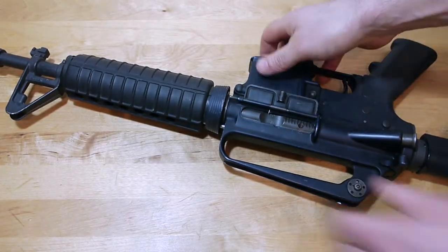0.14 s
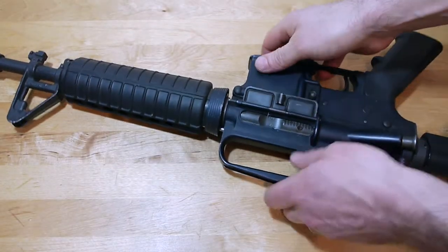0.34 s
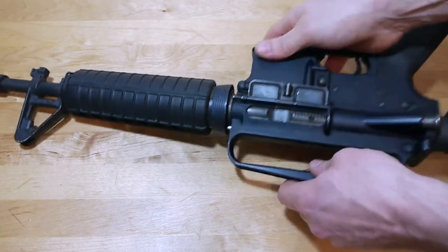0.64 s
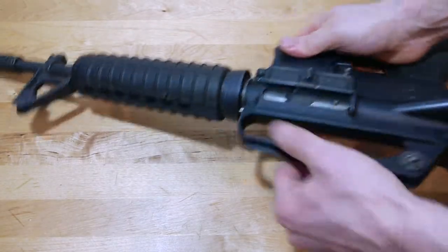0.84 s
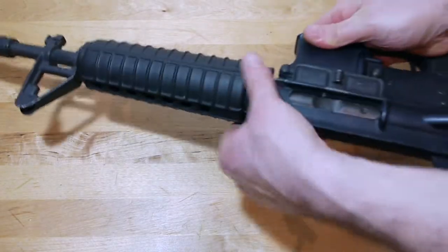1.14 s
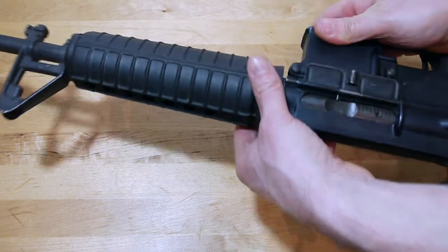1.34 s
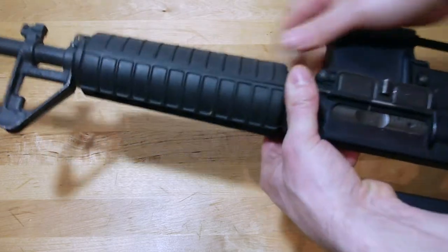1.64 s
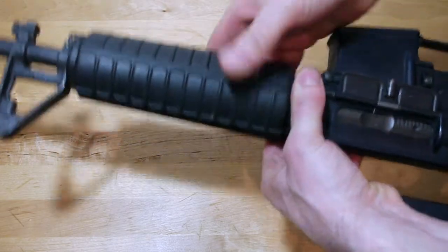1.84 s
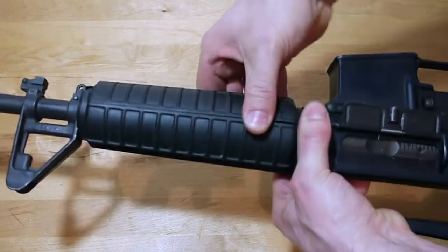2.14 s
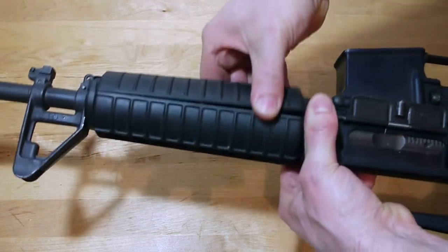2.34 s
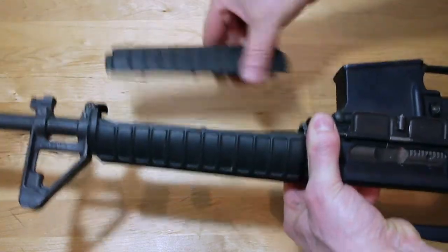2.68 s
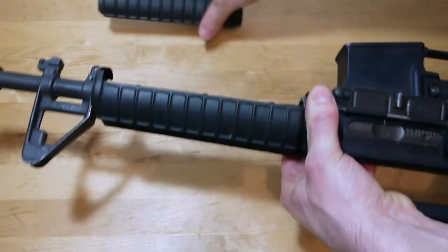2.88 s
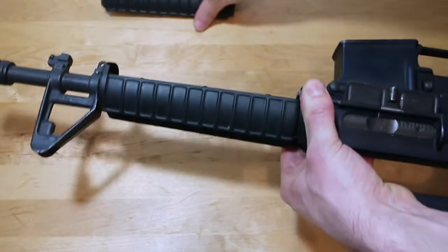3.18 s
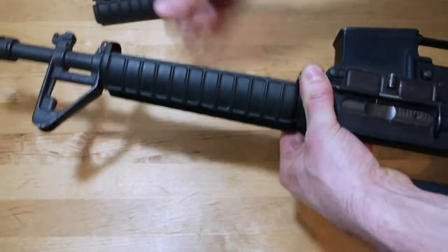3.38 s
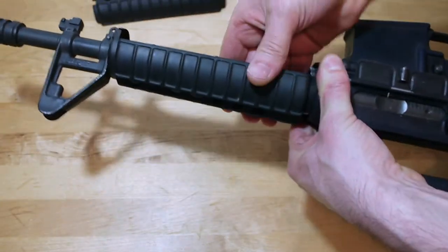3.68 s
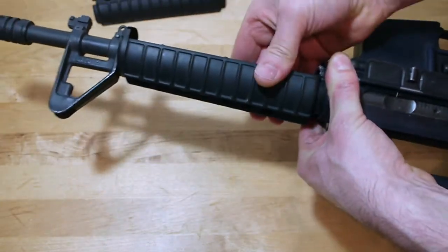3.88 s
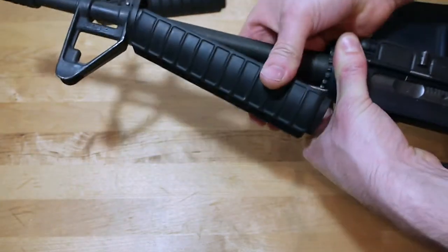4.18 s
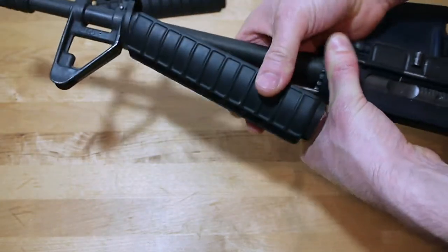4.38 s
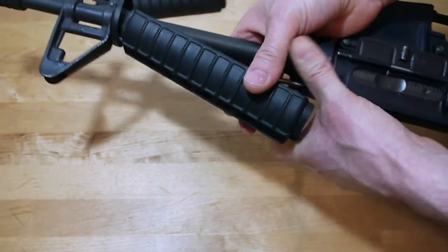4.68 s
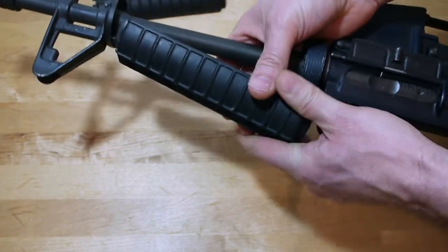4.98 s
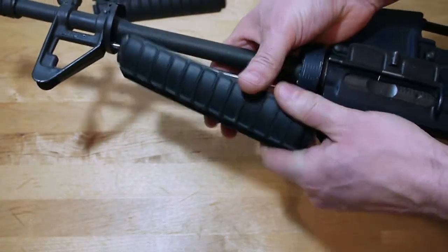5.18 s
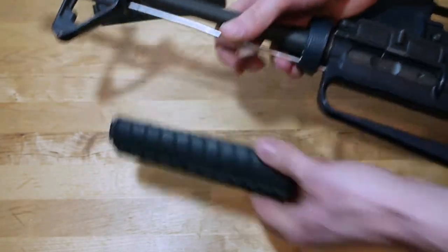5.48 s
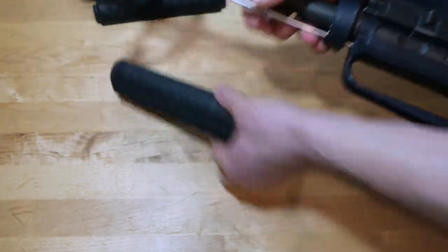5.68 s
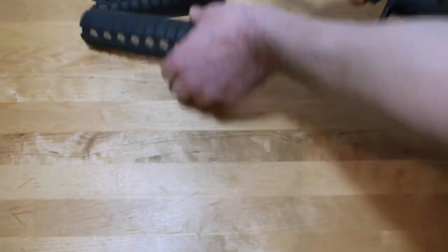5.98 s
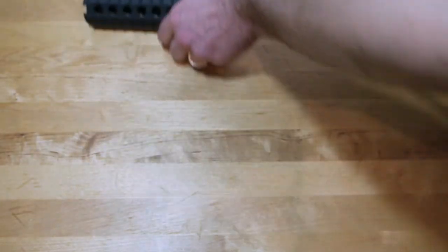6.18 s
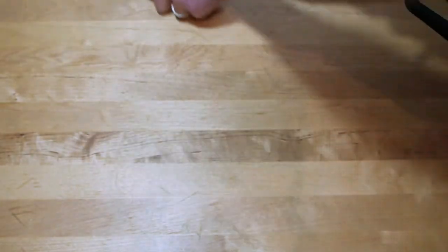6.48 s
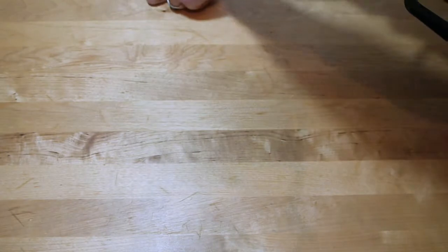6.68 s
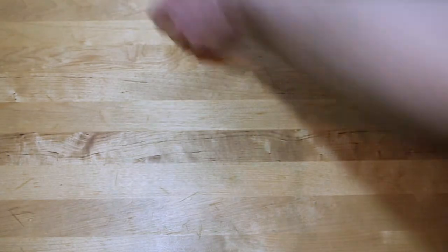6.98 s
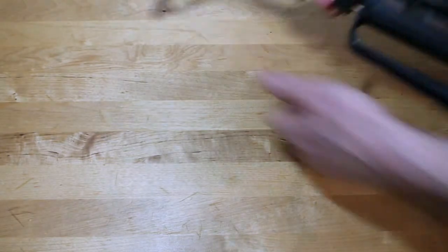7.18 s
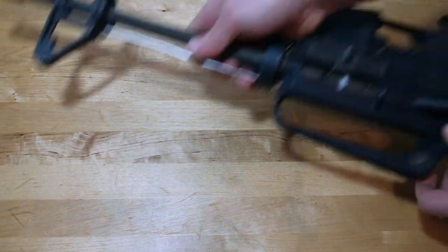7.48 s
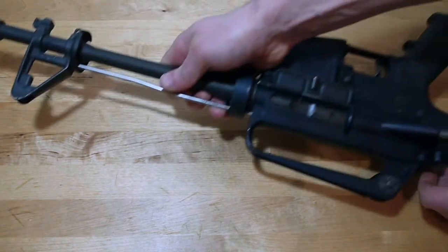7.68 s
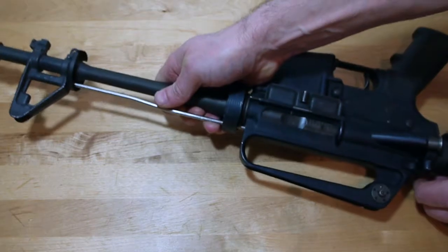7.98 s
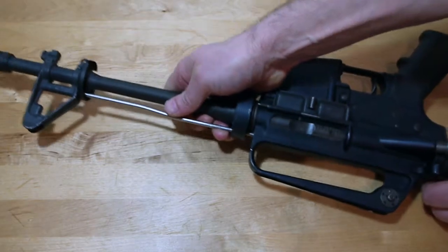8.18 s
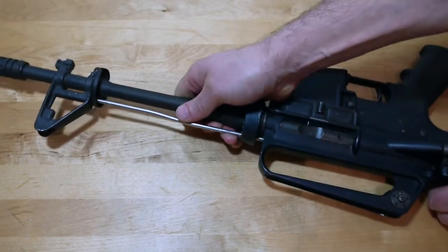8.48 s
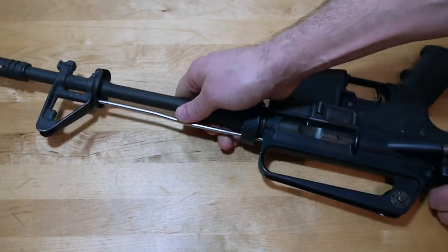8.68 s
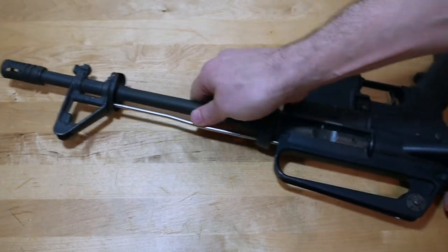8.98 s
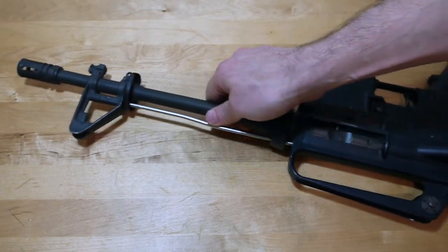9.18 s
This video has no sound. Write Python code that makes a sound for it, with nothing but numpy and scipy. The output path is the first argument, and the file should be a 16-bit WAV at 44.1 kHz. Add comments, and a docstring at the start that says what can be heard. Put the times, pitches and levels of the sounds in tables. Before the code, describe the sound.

In a small live room, gripped plastic clicks and creaks, a loose shell drops and another slides on wood, then a rifle thumps and rattles down.

```python
"""Stripping the handguard of a toy rifle

Hands take the two plastic handguard shells off an airsoft rifle at a wooden table in a small, live room.
Impacts (thumps, clatter, snaps, clicks) excite decaying modes, a rattle of loose parts and reflections.
Friction (skin on plastic, dragging, scraping, a shell sliding on wood) is a train of random slips
through resonances. Loose steel parts chatter in weakening bounces over faint, filtered room noise."""
import sys
import numpy as np
from scipy import signal
from scipy.fft import rfft, irfft, next_fast_len
from scipy.io import wavfile
from scipy.ndimage import uniform_filter1d

SR = 44100
rng = np.random.default_rng(int(sys.argv[2]) if len(sys.argv) > 2 else 0)


def transcribe(u):
    """Save the signal u as a 16-bit wav file named by the first command-line argument.

    u: samples, shape (n,) or (channels, n), limited to [-1, 1]; the rate is SR.
    q: integer samples, one column per channel.
    """
    v = np.clip(np.atleast_2d(u).T, -1, 1)
    q = np.round(v * 32767).astype(np.int16)
    wavfile.write(sys.argv[1], SR, q)


N = 411894  # length of the scene [samples]
AGE = np.arange(2 ** 15) / SR  # time since an excitation [s]


def undb(db):
    """Level definition: decibels to amplitude gain."""
    return 10 ** (np.asarray(db) / 20)


def unit(x):
    """Energy normalisation: scale to unit energy."""
    return x / np.sqrt(np.sum(x ** 2))


def steady(x):
    """Power normalisation: scale to unit rms."""
    return unit(x) * np.sqrt(len(x))


def fade(t60):
    """Exponential damping: the level falls 60 dB in t60 seconds."""
    return np.exp(-np.log(1000) * AGE / t60)


def curve(s, db):
    """Amplitude envelope: linear in dB between points, silent outside them."""
    return undb(np.interp(np.arange(N) / SR, s, db, left=-np.inf, right=-np.inf))


def strokes(table, attack_s, release_s):
    """Envelopes of rubbing: each stroke swells, holds and fades, by 10 dB per attack or release time."""
    t = np.arange(N) / SR
    total = 0
    for start, length, db in table:
        before = np.maximum(start - t, 0)
        after = np.maximum(t - start - length, 0)
        total = total + undb(db - 10 * before / attack_s - 10 * after / release_s)
    return total


def add(out, s, x):
    """Superposition: mix x in at time s."""
    i = int(s * SR)
    out[i:i + len(x)] += x[:N - i]


def colour(x, points):
    """Minimum-phase filtering through (Hz, dB) points, falling away under the lowest."""
    size = next_fast_len(len(x) // 2 + 1) * 2
    hz, db = np.transpose(points)
    f = np.maximum(np.arange(size // 2 + 1) * SR / size, 1)
    low_rolloff = np.sqrt(1 + (hz[0] / 2 / f) ** 4)
    gain = undb(np.interp(np.log(f), np.log(hz), db)) / low_rolloff
    # folding the cepstrum onto positive time makes the filter causal
    cepstrum = irfft(np.log(gain))
    cepstrum[1:size // 2] *= 2
    cepstrum[size // 2 + 1:] = 0
    return irfft(rfft(x, size) * np.exp(rfft(cepstrum)))[:len(x)]


def resonate(x, modes):
    """Forced resonance: parallel second-order peaks (Hz, width Hz, dB)."""
    total = 0
    for hz, width, db in modes:
        total = total + undb(db) * signal.lfilter(*signal.iirpeak(hz, hz / width, fs=SR), x)
    return total


def burst(t60):
    """High modal density: countless close modes dying together sound as decaying noise."""
    return unit(rng.standard_normal(len(AGE)) * fade(t60))


def ring(modes, detune, scatter_db):
    """Modal synthesis: damped sines; grip and striking point shift them a little each time."""
    chance = rng.standard_normal((len(modes), 3))
    total = 0
    for (hz, db, t60), (level, pitch, sign) in zip(modes, chance):
        tone = unit(np.sin(2 * np.pi * hz * (1 + detune * pitch) * AGE) * fade(t60))
        total = total + np.sign(sign) * undb(db + scatter_db * level) * tone
    return unit(total)


def slips(per_s, spread_db):
    """Stick-slip friction: tiny slips at random moments, a few much larger than the rest."""
    sizes = undb(spread_db * np.minimum(rng.exponential(size=N), 4))
    return steady((rng.random(N) < per_s / SR) * sizes * rng.standard_normal(N))


# Spectrum of the reflections: (frequency [Hz], relative level [dB])
ROOM_COLOUR = [(60, 4.5), (150, 0), (420, 5), (1100, 1), (2700, -0.5), (5500, 3.5), (7500, -4.5)]
ROOM_T60_S, ROOM_BASS_T60_S = 0.44, 0.29  # above and below 200 Hz


def room(x, build_s=0.0036):
    """Reverberation: reflections build up within milliseconds; bass and treble decay at their own rates."""
    bass = signal.butter(2, 200, fs=SR)
    treble = signal.butter(2, 200, "high", fs=SR)
    tail = signal.lfilter(*bass, burst(ROOM_BASS_T60_S)) + signal.lfilter(*treble, burst(ROOM_T60_S))
    tail = unit(tail * (1 - np.exp(-(AGE / build_s) ** 2)))
    return signal.fftconvolve(x, colour(tail, ROOM_COLOUR))[:len(x)]


# Edges of the five bands in which blows are coloured: (frequency [Hz])
BANDS_HZ = [70, 250, 700, 1800, 4000, 7500]


def weigh(x, levels_db):
    """Spectral weighting: each band holds the energy of 10 ms at its level."""
    edges = np.array(BANDS_HZ)
    power = np.abs(rfft(x)) ** 2 * 2 / len(x) / (SR / 100)
    band_energy = np.add.reduceat(power, edges * len(x) // SR)[:-1]
    gain_db = levels_db - 10 * np.log10(band_energy)
    # a soft contact keeps falling towards the top
    top_db = gain_db[-1] + min(gain_db[-1] - gain_db[-2], 0) / 2
    centres = np.sqrt(edges[1:] * edges[:-1])
    return colour(x, [*zip(centres, gain_db), (edges[-1], top_db)])


# harder blows set more loose parts rocking: the rattle's peak gain is 0 dB for a blow at RATTLE_FULL_DB
RATTLE_FULL_DB, RATTLE_DB_PER_DB = -17, 1.48
RATTLE_HZ, RATTLE_WIDTH_HZ = 1720, 770
RATTLE_PER_S, RATTLE_RISE_S, RATTLE_T60_S = 600, 0.055, 0.42


def rattle(blow, db):
    """Repeated impacts: loose parts rock, repeating the blow weakly at uneven gaps, dying away."""
    size = len(AGE)
    contacts = (rng.random(size) < RATTLE_PER_S / SR) * rng.uniform(-1, 1, size)
    contacts = unit(contacts * fade(RATTLE_T60_S) * (1 - np.exp(-AGE / RATTLE_RISE_S)))
    repeats = signal.fftconvolve(blow, contacts)[:size]
    gain_db = RATTLE_DB_PER_DB * (db - RATTLE_FULL_DB)
    return resonate(repeats, [(RATTLE_HZ, RATTLE_WIDTH_HZ, gain_db)])


THUD_OCTAVES = 1.01  # spread of the low resonance to either side
RIFLE_THUD_HZ, RIFLE_EDGE_HZ = 126, 1030  # the heavy rifle booms the tabletop and its contacts are soft
PART_THUD_HZ, PART_EDGE_HZ = 400, 2100  # light parts sound hollow and their contacts are hard
# rattle before its gain by strength; a gripping hand damps it
HELD_RATTLE_DB, SHELL_RATTLE_DB, METAL_RATTLE_DB = -16.5, -3.5, -0.5


def blows(table, modes, colour_db, room_db, thud_hz, edge_hz, rattle_db,
          tick_db, crack_t60, body_t60, body_db, ring_db, lowest_hz, rise_s=0.0007, grain_db=-7):
    """Impact excitation: a tick and a short crack, then the body rings, parts rattle, the room answers."""
    out = np.zeros(N)
    tick = signal.unit_impulse(len(AGE))
    hz = np.sqrt(np.multiply(BANDS_HZ[1:], BANDS_HZ[:-1]))
    thud = np.exp(-(np.log2(hz / thud_hz) / THUD_OCTAVES) ** 2)
    edge = 1 / (1 + (edge_hz / hz) ** 2)
    for s, db, thud_db, edge_db in table:
        levels_db = db + np.array(colour_db) + thud_db * thud + edge_db * edge
        crack = unit(burst(crack_t60) * (1 - np.exp(-AGE / rise_s)))
        contact = unit(undb(tick_db) * tick + crack + undb(body_db) * burst(body_t60))
        tones = undb(ring_db) * ring(modes, detune=0.0032, scatter_db=2.5)
        near = weigh(contact + tones, levels_db)
        # the walls hear the body from all sides, which evens out its colour
        spread = weigh(tick + undb(grain_db) * contact + tones, levels_db)
        loose = undb(rattle_db) * rattle(weigh(tick, levels_db), db)
        add(out, s, near + loose + undb(room_db) * room(spread + loose))
    # small bodies radiate no deep bass
    return signal.sosfilt(signal.butter(2, lowest_hz, "high", fs=SR, output="sos"), out)


# Spectrum of the room noise: (frequency [Hz], relative level [dB])
ROOM_NOISE = [(15, -71), (25, -17.5), (107, -8), (299, -7), (371, -8), (494, -6.5), (543, -10),
              (612, -10.5), (855, -10), (1110, -13), (1250, -13), (1380, -13), (6050, -24.5), (7500, -46),
              (9750, -77.5), (16500, -120)]
ROOM_NOISE_DB = -62.5


def room_noise():
    """Stationary random noise: Gaussian noise shaped by a fixed spectrum."""
    return undb(ROOM_NOISE_DB) * steady(colour(rng.standard_normal(N), ROOM_NOISE))


# Fingers shifting their grip: (start [s], length [s], level before rub_db [dB])
RUB = [(0, 0.16, -54), (0.4, 1.38, -61), (0.98, 0.53, -64), (1.9, 0.26, -69.5), (3.03, 0.35, -65.5),
       (5.3, 1.1, -66.5), (7.29, 0.11, -61.5), (8.16, 0.064, -55), (8.99, 0.24, -51)]
# Spectrum of skin on plastic: (frequency [Hz], relative level [dB])
RUB_COLOUR = [(88, -32), (150, -4), (241, -15.5), (279, 2), (584, -5.5), (722, 0.5), (1340, -0.5),
              (2020, -1.5), (5680, -6), (7500, -13.5), (9750, -68.5), (16500, -120)]
# The rifle dragging on the table, and a short rattle right after the blow at 8.38 s: (start [s], length [s],
# level before drag_db [dB])
DRAG = [(3.17, 0.059, -61.5), (8.06, 0.32, -71.5), (8.38, 0.083, -37), (8.88, 0.43, -56.5)]
# Modes of the wooden table, also struck by the knocks: (frequency [Hz], relative level [dB], t60 [s])
TABLE_MODES = [(96, -6.5, 0.12), (138.2, 8, 0.29), (171.6, 4, 0.32), (193, -23, 0.51), (431, -19, 0.054),
               (466.7, 2.5, 0.057), (473, -13, 0.36), (731, -9.5, 0.22), (863, 2.5, 0.055), (990, -2, 0.25),
               (1394, 0, 0.13), (1460, -3.5, 0.15)]
HOLD_DB = -69  # the faint rub of hands that merely hold on, before rub_db
STROKE_ATTACK_S, STROKE_RELEASE_S = 0.081, 0.06  # time to swell or fade by 10 dB


def handling(rub_db=-2, drag_db=-2, room_db=-3):
    """Dry friction: fingers rub over ribbed plastic; the rifle drags, and a short rattle follows a blow, both
    exciting the tabletop's modes."""
    grip = np.hypot(strokes(RUB, STROKE_ATTACK_S, STROKE_RELEASE_S), undb(HOLD_DB))
    rub = steady(colour(slips(6000, 0.74), RUB_COLOUR)) * grip
    tabletop = [(hz, hz / 9, db) for hz, db, _ in TABLE_MODES]
    drag = steady(resonate(slips(4000, 1.2), tabletop)) * strokes(DRAG, STROKE_ATTACK_S, STROKE_RELEASE_S)
    both = undb(rub_db) * rub + undb(drag_db) * drag
    return both + undb(room_db) * room(both)


# The spring collar, pulled back along the barrel, catches in jerks: (time [s], level [dB])
COLLAR = [(1.102, -35.5), (1.12, -53), (1.148, -59)]
# Resonances of collar and spring: (frequency [Hz], width [Hz], relative level [dB])
COLLAR_MODES = [(2530, 150, 1.5), (5240, 150, -5), (5960, 180, -2), (6440, 320, 2.5), (7540, 220, 9)]
COLLAR_T60_S = 0.24


def collar(room_db=-3):
    """Friction-driven resonance: steel scrapes on steel in short jerks and the coil spring zings."""
    jerks = np.zeros(N)
    for s, db in COLLAR:
        add(jerks, s, undb(db) * fade(COLLAR_T60_S))
    zing = steady(resonate(slips(3000, 1.6), COLLAR_MODES)) * jerks
    return zing + undb(room_db) * room(zing)


# A shell grating over its retaining lip as it is prised free: (start [s], length [s], level [dB])
PRISE = [(2.435, 0.06, -42), (3.975, 0.066, -47), (4.515, 0.045, -57)]
# Modes of a shell still clamped on the barrel, also rung by the clicks:
# (frequency [Hz], relative level [dB], t60 [s])
CLAMPED_MODES = [(451.6, 8, 0.043), (670, -10, 0.085), (818, 8, 0.11), (1007, -12.5, 0.15),
                 (1196, -10.5, 0.11), (1406, -1, 0.097), (1886, 9, 0.16), (2800, 8, 0.2), (3390, -1, 0.031),
                 (4360, 10.5, 0.027)]


def prise(edge_hz=4200, edge_width_hz=5000, edge_db=1, room_db=-3):
    """Stick-slip: coarse slips of a plastic edge, bright themselves and ringing the clamped shell."""
    shell = [(hz, hz / 14, db) for hz, db, _ in CLAMPED_MODES]
    edge = (edge_hz, edge_width_hz, edge_db)
    grate = steady(resonate(slips(700, 1.8), shell + [edge])) * strokes(PRISE, 0.026, 0.015)
    return grate + undb(room_db) * room(grate)


# The shell sliding on wood, levels before the trims of slide():
# (time [s], lower drone level [dB], upper drone level [dB], scratch level [dB])
SLIDE = [(5.86, -54, -52, -52), (5.90, -40, -44, -49), (6.05, -43, -53, -58), (6.13, -55, -43, -56),
         (6.23, -56, -41, -46), (6.28, -49, -31, -45), (6.39, -45, -34, -35), (6.50, -51, -50, -34),
         (6.69, -48, -43, -51), (6.75, -63, -63, -68)]
# Resonances of the lower drone: (frequency [Hz], width [Hz], relative level [dB])
SLIDE_LOW = [(301, 33, 2), (334, 28, -6.5)]
# Resonances of the upper drone: (frequency [Hz], width [Hz], relative level [dB])
SLIDE_MID = [(452, 11, 6), (400, 47, -16), (635, 43, -23)]
# Resonances of the scratch: (frequency [Hz], width [Hz], relative level [dB])
SLIDE_HIGH = [(740, 50, 2), (842, 26, 6.5), (1040, 100, 4.5), (1320, 69, 1), (1520, 160, -13),
              (1905, 77, 2), (2800, 710, -17.5), (4320, 830, -42.5)]
SCRATCH_HZ, SLOWS_FROM_S, SAG_HZ_PER_S = 1614, 6.33, 1900  # the scratch sinks as the shell slows


def slide(low_db=-1, mid_db=-1, scratch_db=-3, glide_db=-3, glide_width_hz=350, room_db=-13):
    """Stick-slip oscillation: the hollow shell drones in its low modes and scratches in its high ones."""
    s, low, mid, scratch = np.transpose(SLIDE)
    out = steady(resonate(slips(2500, 2.9), SLIDE_HIGH)) * curve(s, scratch + scratch_db)
    # a noise band whose centre glides down: complex low-passed slips on a rotating carrier
    slowing_s = np.clip(np.arange(N) / SR, SLOWS_FROM_S, s[-1]) - SLOWS_FROM_S
    centre_hz = SCRATCH_HZ - SAG_HZ_PER_S * slowing_s
    phase = 2 * np.pi * np.cumsum(centre_hz) / SR
    complex_slips = slips(2300, 6.9) + 1j * slips(1800, 1.8)
    grain = signal.lfilter(*signal.butter(2, glide_width_hz / 2, fs=SR), complex_slips)
    out += steady(np.real(grain * np.exp(1j * phase))) * curve(s, scratch + glide_db)
    for modes, db in (SLIDE_LOW, low + low_db), (SLIDE_MID, mid + mid_db):
        drone = resonate(slips(1500, 0.87), modes)
        # friction feeds a mode only up to the swing that hand pressure allows
        swing = np.sqrt(uniform_filter1d(drone ** 2, size=1200))
        out += drone / swing * curve(s, db)
    return out + undb(room_db) * room(out)


# A loose steel part thrown against its seat, then bouncing: (time [s], level of the first tick [dB])
CHATTER = [(0.5227, -22.5), (0.5365, -14.5), (0.5931, -29), (0.6484, -21), (0.6908, -19), (0.7094, -23),
           (0.7572, -21.5), (0.7936, -24.5), (7.886, -20), (7.9199, -19), (7.939, -35), (7.9828, -28),
           (8.023, -24), (8.0696, -25), (8.1095, -26.5), (8.3265, -11), (9.1252, -18), (9.1915, -21),
           (9.2479, -22), (9.2798, -24)]
BOUNCE_GAP_S, BOUNCE_LOSS_DB = 0.028, 10.5  # mean gap; loss at each bounce


def chatter(room_db=-8, count=3):
    """Inelastic bouncing: small steel parts tick ever more weakly, each time with another mix of modes."""
    out = np.zeros(N)
    for s, db in CHATTER:
        for bounce in range(count):
            low, mid, high = 4 * rng.standard_normal(3)
            modes = [(4260, 250, -4 + low), (4800, 310, 3 + mid), (6170, 210, -6 + high)]
            tick = resonate(burst(0.013), modes)
            tick = unit(signal.lfilter(*signal.butter(4, 3400, "high", fs=SR), tick))
            add(out, min(s, (N - 1) / SR), undb(db - bounce * BOUNCE_LOSS_DB) * tick)
            s += BOUNCE_GAP_S * (.5 + rng.random())
    return out + undb(room_db) * room(out)


# Plastic edges catching and slipping: (time [s], strength [dB],
# thud: excitation of the low resonance [dB], edge: extra treble from a hard contact [dB])
CLICKS = [(0.95, -45.5, 8, -9), (1.522, -46, 5, -21), (1.576, -42.5, -24, -15.5), (2.311, -51, -15, 3),
          (2.36, -33.5, -16, -21.5), (2.431, -43, 0, 12.5), (2.457, -37.5, -2, 9), (2.496, -55, 24, 5),
          (2.508, -46, -5, 14.5), (2.629, -56.5, 13, 25.5), (3.639, -53.5, -3, -6), (3.737, -52, -49, 3),
          (3.975, -39, 2, -3), (3.999, -48, 15.5, 11), (4.04, -38, -1, -8), (4.31, -36.5, -8, 4),
          (4.381, -45, 1, -10), (4.539, -51.5, 5, 0), (4.599, -38.5, 3, 2.5), (4.643, -46.5, -1, 1),
          (4.722, -55, 9, 10), (5.068, -58, 15.5, -15), (5.13, -45, 5, -9), (5.137, -56, -6, 12.5)]
# Colour of a click in the five bands: (relative level [dB])
CLICK_COLOUR = [-24.5, -11.5, -2, -1, -6]


def clicks():
    """Impulsive release: plastic edges catch and slip, ringing the shell still clamped on the barrel."""
    return blows(CLICKS, CLAMPED_MODES, CLICK_COLOUR, -5.5, PART_THUD_HZ, PART_EDGE_HZ, HELD_RATTLE_DB,
                 tick_db=-8, crack_t60=.015, body_t60=.05, body_db=-8, ring_db=-15, lowest_hz=130)


# Metal parts snapping against their stops, and one loud hard blow at 8.38 s: (time [s], strength [dB], thud
# [dB], edge [dB])
SNAPS = [(0.24, -25.5, -19, -5), (1.103, -66, 3, 24), (2.853, -59, -4, 26), (7.126, -35.5, -2, -5),
         (8.319, -38, 10, -10), (8.3757, -16, -0.5, -6.5)]
# Modes of the metal parts: (frequency [Hz], relative level [dB], t60 [s])
METAL_MODES = [(1300, 16, 0.23), (1900, 13, 0.14), (2730, 0.5, 0.22), (4730, -5.5, 0.074), (5190, 5.5, .2),
               (6150, -27, 0.12), (6050, 19.5, 0.18), (6740, -45, 0.16)]
# Colour of a snap in the five bands: (relative level [dB])
SNAP_COLOUR = [-28, -9, -5, -2, -3]


def snaps():
    """Hard impact: metal parts snap against their stops, and one loud hard blow joins them; all ring in high
    modes."""
    return blows(SNAPS, METAL_MODES, SNAP_COLOUR, -7.5, PART_THUD_HZ, PART_EDGE_HZ, METAL_RATTLE_DB,
                 tick_db=-8, crack_t60=.012, body_t60=.05, body_db=-11, ring_db=-13, lowest_hz=70)


# A loose shell landing and bouncing: (time [s], strength [dB], thud [dB], edge [dB])
DROPS = [(3.2742, -15.5, -3, -8.5), (3.2808, -33, 6.5, 20.5), (3.298, -49, -4, -1), (3.327, -26, 4.5, 2.5),
         (5.7645, -36, 12.5, 4), (5.777, -29.5, 18.5, -13), (5.809, -33, 9, -13), (6.249, -46.5, 16, 21),
         (6.335, -17, -10.5, -7)]
# Modes of a free plastic shell: (frequency [Hz], relative level [dB], t60 [s])
SHELL_MODES = [(291, -4, .16), (450, 2, .2), (614, -11, .12), (1124, -9, .12), (1380, -5, .14),
               (1495, 1, .14), (1617, -4, .1), (1950, -6, .08), (2150, -2, .14), (2440, -5, .07),
               (3500, -1, .04), (4370, -1, .06)]
# Colour of a landing in the five bands: (relative level [dB])
DROP_COLOUR = [-15, -9, -3, -1, -10.5]


def drops():
    """Free-body ringing: a loose hollow shell lands on the wood and clatters in its own modes."""
    return blows(DROPS, SHELL_MODES, DROP_COLOUR, -2.5, PART_THUD_HZ, PART_EDGE_HZ, SHELL_RATTLE_DB,
                 tick_db=-5, crack_t60=.013, body_t60=.08, body_db=-9, ring_db=-7, lowest_hz=115)


# The whole rifle meeting the table: (time [s], strength [dB], thud [dB], edge [dB])
KNOCKS = [(0.069, -52, 0, 3), (0.229, -37, 6, -13), (0.503, -38, 10.5, 15), (0.66, -32, 13, 8),
          (0.695, -40, 7, 14), (7.8645, -18.5, -10, -9), (7.88, -20, -15, -17), (7.8965, -41, -12, -15),
          (7.991, -25.5, -19.5, -6), (8.007, -28.5, -19, -14), (8.0235, -38, -4, -11),
          (8.3245, -28.5, 0.5, -2), (9.102, -26, -7, -8.5)]
# Colour of a knock in the five bands: (relative level [dB])
KNOCK_COLOUR = [-4.5, -1, -2, -7.5, -23]


def knocks():
    """Plate excitation: the heavy rifle strikes the tabletop softly and sets its low modes booming."""
    return blows(KNOCKS, TABLE_MODES, KNOCK_COLOUR, -5, RIFLE_THUD_HZ, RIFLE_EDGE_HZ, HELD_RATTLE_DB,
                 tick_db=-11.5, crack_t60=0.036, body_t60=0.26, body_db=-1, ring_db=-6.5, lowest_hz=64.6)


def scene():
    """Linear superposition: all the blows and friction over the room's own noise."""
    friction = handling() + collar() + prise() + slide()
    impacts = chatter() + clicks() + snaps() + drops() + knocks()
    return (room_noise() + friction + impacts)[None]


def record(dry):
    """Band limiting: the recorder cuts steeply above 7 kHz."""
    return signal.sosfilt(signal.cheby1(12, .3, 7000, fs=SR, output="sos"), dry)


dry = scene()
out = record(dry)
transcribe(out)
```